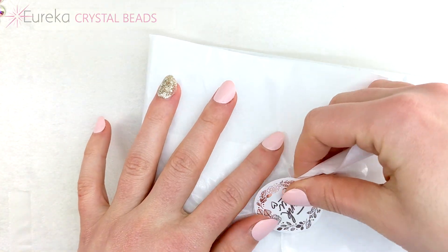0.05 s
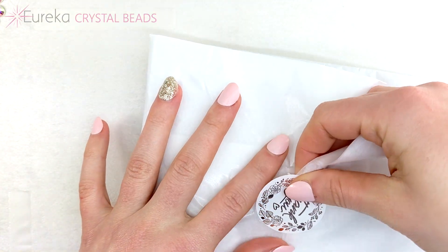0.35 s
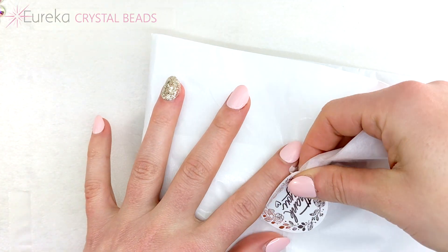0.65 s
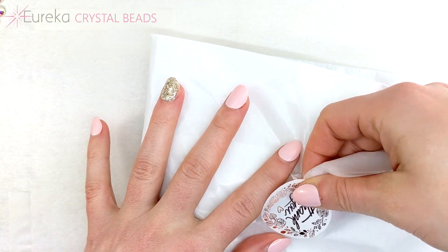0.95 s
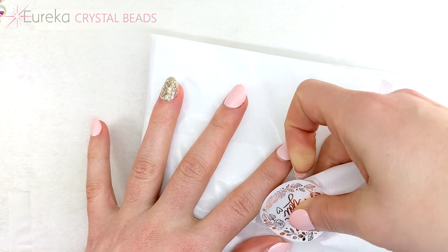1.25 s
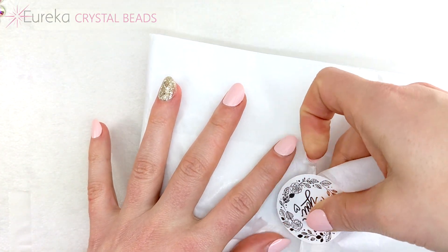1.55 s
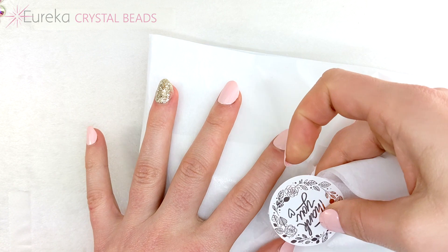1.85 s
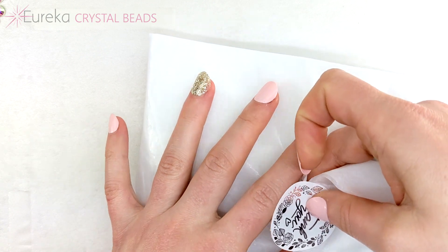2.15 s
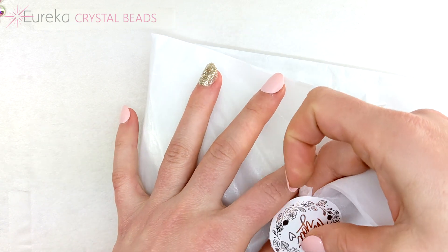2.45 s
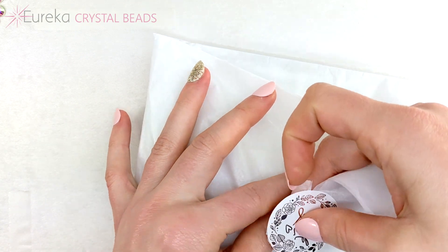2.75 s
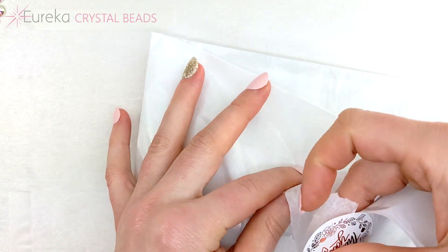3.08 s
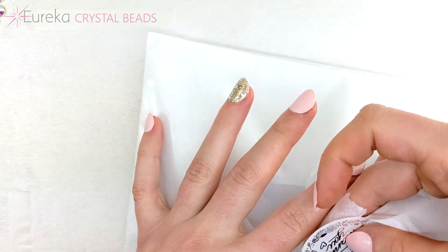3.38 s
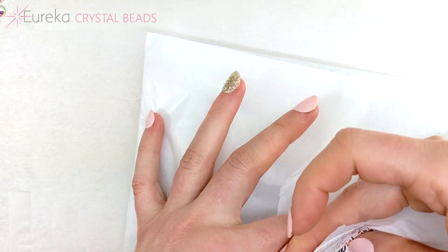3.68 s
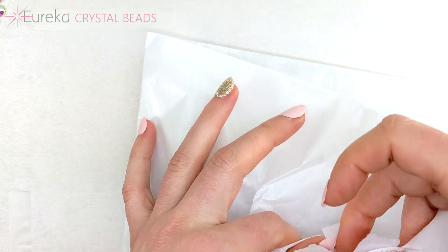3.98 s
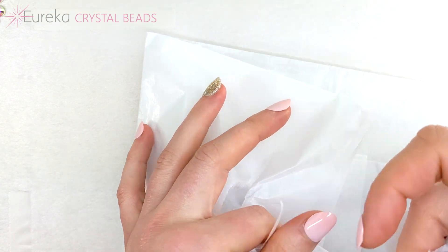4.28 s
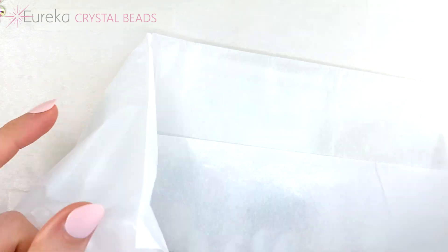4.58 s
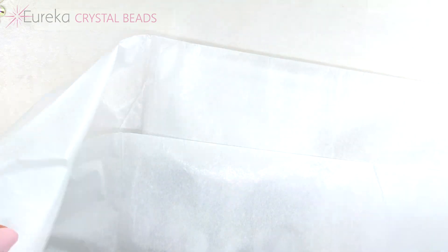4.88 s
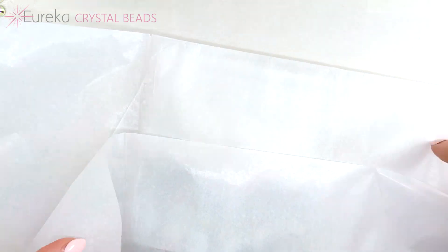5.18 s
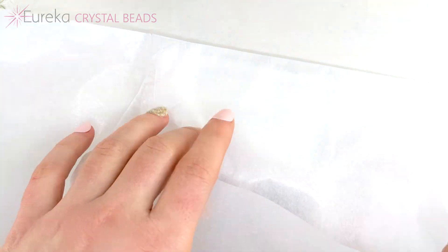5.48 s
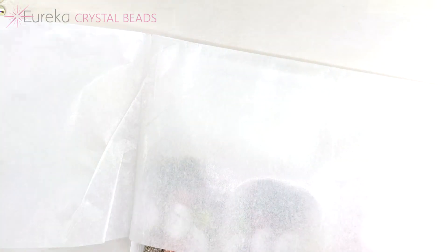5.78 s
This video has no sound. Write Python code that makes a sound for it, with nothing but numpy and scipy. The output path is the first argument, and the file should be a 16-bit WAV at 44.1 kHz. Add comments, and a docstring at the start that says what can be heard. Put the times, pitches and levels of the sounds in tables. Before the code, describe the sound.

A sharp, close crackle comes right at the start as hands begin peeling a sticker off a tissue paper parcel. Until about 3 seconds, short, uneven pulls tear the paper with dry crinkles and ticks. Single creases snap out, sharpest around 1.4, 2.3 and 2.9 seconds. From about 3.1 seconds the flap is crumpled aside, softer at first, with a fuller crunch near 4 seconds. From 4.4 seconds the sheet is swept open in longer, swishing rustles with a few more snaps. It eases briefly after 5 seconds, then the strongest swish comes around 5.7 to 5.9 seconds as the paper is flattened. Throughout, the parcel rubs faintly and dully on the table, and a faint low hum swells as the hands press. The paper sits slightly to the right, close to a stereo microphone in a small, quiet room.

```python
"""First comes a sharp crackle, close up: hands peel a sticker off a tissue paper parcel, tearing the paper.
Then they fold the sheet open on the table. Each stroke sets off a swarm of tiny buckles, single creases
snap out of the rustle, and the parcel rubs dully on the table. The stereo microphone is close by, in a
small, quiet room with a faint low hum that swells as the hands press."""
import sys
import numpy as np
from scipy import signal
from scipy.fft import rfft, irfft, next_fast_len
from scipy.io import wavfile
from scipy.ndimage import uniform_filter1d, map_coordinates

SR = 44100
rng = np.random.default_rng(int(sys.argv[2]) if len(sys.argv) > 2 else 0)


def int16_out(signal):
    """Quantize to a 16-bit WAV file."""
    q = np.round(np.clip(np.atleast_2d(signal).T, -1, 1) * 32767)
    wavfile.write(sys.argv[1], SR, q.astype(np.int16))


N = 261513

# Still air of the room. Each row: frequency in Hz, relative level in dB.
AIR_SPECTRUM = [(25, -12), (70, -5), (130, 10), (250, -4), (600, -4), (1200, -4), (4000, 1), (16000, -36)]
# Dull rub on the table. Each row: frequency in Hz, relative level in dB.
RUB_SPECTRUM = [(25, -39), (50, -21), (80, -12.5), (120, -2), (160, -4.5), (190, 4), (230, -1.5), (300, 2),
                (420, -21.5)]
# Hands press the parcel down. Each row: start, attack and hold in seconds, rub in dB, hum swell in dB
# against the rub. table_rub() and hum() add their own trims.
HAND_PRESSES = [(-0.016, 0.045, 0.018, -66, -9.5), (0.08, 0.2, 0.089, -71.5, 0),
                (0.469, 0.071, 0.18, -81.5, 2.5), (0.756, 0.054, 0.034, -69.5, -9),
                (1.009, 0.094, 0.22, -77, -1), (1.426, 0.036, 0.044, -73.5, -6),
                (1.764, 0.066, 0.066, -67.5, -7), (2.609, 0.233, 0.115, -73.5, 0.5),
                (2.946, 0.07, 0.013, -62.5, 1), (3.387, 0.25, 0.059, -74, -4.5),
                (3.746, 0.28, 0.049, -66, -2), (4.45, 0.066, 0.43, -63.5, -5.5),
                (4.923, 0.033, 0.015, -67.5, -15.0), (5.123, 0.049, 0.02, -71, -13.5),
                (5.359, 0.16, 0.095, -65.5, -3.5), (5.671, 0.08, 0.091, -53.5, -14)]
# Colour of the paper. Each row: frequency in Hz, gain in dB.
PAPER_COLOUR = [(200, -14), (300, -17.5), (450, -10.5), (750, -8.5), (1000, -19), (1300, -10.5), (1800, -2),
                (2900, -5), (4000, 0.5), (7500, 2), (9300, 0), (10500, 1), (13500, 12), (16000, -1.5)]
# Resonances of the sheet over the table. Each row: frequency in Hz, width in Hz, lift in dB.
SHEET_RESONANCES = [(559, 93, 4.5), (1396, 133, 6), (2286, 66, 6.5), (3160, 350, 3), (4360, 37, 5.5),
                    (4920, 84, -1.5), (7170, 55, 3.5), (11600, 420, -18)]
# Hollow note of the taut wrapping. Each row: time in seconds, lift in dB.
HOLLOW_LIFT = [(0, 1.5), (2.2, 0), (4.1, 0), (5.2, -2.5)]
# The paper as the microphone hears it, swinging right as it opens.
# Each row: time in seconds, delay of the left channel in seconds.
PAPER_BEARING = [(0, .00008), (4.4, .00008), (4.7, .00018), (5.05, .00028), (5.2, 0), (5.4, 0),
                 (5.55, .00012), (5.93, .0001)]
# Short pulls at the sticker; from 3.1 s the flap is crumpled aside; from 4.4 s the sheet is swept flat.
# Each row: start, attack and hold in seconds, crackle in dB, then folds and flap in dB against the
# crackle. rustle() trims the flap.
HAND_STROKES = [ (-0.016, 0.016, 0.034, -35.5, -6, -13.5), (0.07, 0.072, 0.055, -44.5, -5, -13.5),
                (0.204, 0.04, 0.12, -51, -4.5, -9.5), (0.366, 0.067, 0.03, -54.5, -8, -11.5),
                (0.45, 0.049, 0.033, -43.5, -1.5, -7.5), (0.54, 0.046, 0.11, -47.5, -3.5, -11.5),
                (0.764, 0.016, 0.013, -44, 1, -6.5), (0.801, 0.004, 0.033, -40.5, -4, -10.5),
                (0.975, 0.11, 0.098, -42.5, -8, -18), (1.197, 0.01, 0.051, -48, -9, -20),
                (1.32, 0.014, 0.045, -58.5, 0, -21), (1.417, 0.004, 0.022, -46.5, -6, -25),
                (1.437, 0.031, 0.024, -36.5, -5, -12.5), (1.485, 0.036, 0.026, -41.5, -4.5, -10),
                (1.574, 0.023, 0.11, -58.5, -8.5, -11.5), (1.765, 0.079, 0.027, -32.5, -6, -13.5),
                (1.95, 0.0059, 0.058, -48, -12.5, -15.5), (2.09, 0.051, 0.13, -54, -10.5, -22),
                (2.295, 0.014, 0.029, -39, -11.5, -15.5), (2.392, 0.034, 0.076, -43, -7.5, -22),
                (2.56, 0.059, 0.14, -50.5, -2.5, -13), (2.765, 0.019, 0.12, -44.5, -6, -17.5),
                (2.94, 0.0087, 0.077, -35.5, -2.5, -11), (3.11, 0.054, 0.046, -50, -8, -15.5),
                (3.39, 0.061, 0.037, -48, -3, -13), (3.478, 0.076, 0.042, -42, -1.5, -12.5),
                (3.604, 0.023, 0.042, -51.5, -1, -7), (3.7, 0.055, 0.24, -50.5, -7, -18.5),
                (3.935, 0.046, 0.048, -38, 3, -16), (4.152, 0.013, 0.024, -47.5, 0.5, -31.5),
                (4.225, 0.089, 0.024, -49, -7, -33), (4.39, 0.21, 0.057, -40, -10, -18),
                (4.56, 0.12, 0.15, -38, -8.5, -17), (4.86, 0.061, 0.04, -35.5, -7.5, -19.5),
                (4.969, 0.012, 0.057, -45.5, -12.5, -23), (5.11, 0.014, 0.028, -55.5, -13, -25),
                (5.2, 0.034, 0.05, -40, -7, -20.5), (5.28, 0.083, 0.0073, -39, -8, -21),
                (5.474, 0.07, 0.043, -37.5, -8, -21.5), (5.66, 0.053, 0.083, -34, -6, -15.5),
                (5.735, 0.082, 0.067, -30.5, -9.5, -12)]
# Creases that snap. Each row: time in seconds, level in dB, folds and sizzle in dB against that level,
# ring pitch in Hz, left minus right in dB. snaps() adds its own trims to the levels.
CREASE_SNAPS = [(0.0163, -18.5, -7, -17, 5170, -6), (0.187, -24, -20, -16, 5530, -2),
                (0.3178, -29.5, -24, -11, 9080, -10.5), (0.381, -34, -24, -0.5, 7000, -6),
                (0.473, -33, -3.5, -15, 2380, -5), (0.5109, -30, 1, -12, 2950, -8),
                (0.675, -36, -25, -7, 4170, -10), (0.7362, -28, -8, -12, 4330, -5),
                (0.7654, -37, 6, -12, 2410, -6), (0.7775, -30.5, 7, -11, 2340, -5),
                (0.7998, -20.5, -12, -11, 2340, 0), (0.949, -39.5, -12, -23, 9100, 0),
                (0.9991, -34.5, -16, -23, 6240, -13), (1.0743, -24, -15, -10, 3000, -7),
                (1.228, -26, -23, -9.5, 7120, -2), (1.4163, -28.5, -7, -29, 5050, -13),
                (1.4366, -14, -28, -22, 2320, -2), (1.475, -17.5, -4.5, -19, 4920, -5),
                (1.8038, -23.5, -6, -27, 7230, -12), (1.9533, -28, -7, -15, 5000, 0),
                (1.9766, -32, -18, -3.5, 8140, -8), (2.112, -29, -22, -17, 3380, 7.5),
                (2.159, -42, -24, -5, 9000, 12), (2.2145, -26.5, -6, -12, 8840, -1),
                (2.3135, -23.5, -18, -24, 7500, -7), (2.3207, -14, -11.5, -35, 3640, 0.5),
                (2.3552, -18, -21, -23, 6640, -7.0), (2.4219, -23.5, -28, -5.5, 7030, -10),
                (2.4723, -19.5, -6.5, -14, 6270, -5), (2.5735, -38, -33, 5.5, 9000, -12),
                (2.6342, -21.5, -15, -17, 8970, -5), (2.7119, -29.5, -0.5, -16, 2720, 0),
                (2.7206, -22, -4, -17, 7000, -5), (2.7764, -34, -8, -8, 9150, -12),
                (2.8753, -13, -20, -18, 2330, -4), (2.9447, -17, -22, -15, 9350, 2),
                (2.9672, -20, -8, -9, 2900, -4), (3.1256, -37.5, -10, -1.5, 9500, -5),
                (3.1624, -33.5, -15, -12, 4480, -19.5), (3.232, -44, -21, -1.5, 9200, -19),
                (3.3064, -49, -38, -4, 8850, -8), (3.3328, -49, -17, -14, 7200, -20),
                (3.419, -32, -23, -7, 9400, -3.0), (3.954, -28.5, -13, -3, 2430, -7),
                (4.1564, -42, -1, -27, 2040, 5), (4.17, -23, -7, -34, 2100, 5),
                (4.3046, -24.5, -17, -33, 2860, 4), (4.4433, -23, -23, -25, 4660, 0),
                (4.4857, -19, -13, -21, 4940, -6.5), (4.5407, -25, -9, -18, 8050, -15),
                (4.577, -21.5, -3, -28, 4470, -1), (5.1986, -36.5, -10, -8, 7550, 3),
                (5.227, -22, -25, -9, 7140, -6), (5.3617, -25, -17, -16, 4420, -2.0),
                (5.4748, -41, -1, -18, 2340, 10), (5.5024, -19, -17, -12, 5080, 0),
                (5.678, -30, -15, -11, 7170, -11)]

# The whole sheet sounds low, folds in the middle, fine fibres high. Each pair: band edges in Hz.
FLAP_BAND, FOLDS_BAND = (250, 1150), (980, 2900)
CRACKLE_BAND, SIZZLE_BAND = (2900, 9800), (10400, 20500)


def from_db(db):
    """Decibels to gain."""
    return 10 ** (np.asarray(db) / 20)


def rms_one(x):
    """Scale to unit rms."""
    return x / np.sqrt(np.mean(x ** 2) + 1e-20)


def band(x, low_hz, high_hz, order=4):
    """Causal band-pass."""
    sos = signal.butter(order, [low_hz, min(high_hz, .48 * SR)], "band", fs=SR, output="sos")
    return signal.sosfilt(sos, x + 1e-18)


def resonate(x, hz, width_hz):
    """The part of x that one resonance passes."""
    return signal.lfilter(*signal.iirpeak(hz, hz / width_hz, fs=SR), x)


def coloured(x, spectrum):
    """Give x a smooth spectrum."""
    hz, db = np.transpose(spectrum)
    size = next_fast_len(N + SR // 10)
    bins_hz = np.maximum(np.arange(size // 2 + 1) * SR / size, 1)
    gain = from_db(np.interp(np.log(bins_hz), np.log(hz), db))
    return irfft(rfft(x, size) * gain, size)[..., :N]


def stereo_noise(side_db):
    """White noise whose stereo width is set by side_db."""
    mid, side = rng.standard_normal((2, N))
    return mid + from_db(side_db) * side * [[1], [-1]]


def waver(per_s, depth_db):
    """A gain that wanders at random."""
    knots = rng.standard_normal(4096)
    return from_db(depth_db * np.interp(np.arange(N) / SR * per_s, np.arange(len(knots)), knots))


def gesture(start_s, attack_s, hold_s, release_db_per_s, sag_db_per_s=31.5, creep_share=.12, creep_s=.009):
    """A hand creeps in, takes up the strain, sags as the paper yields and lets go; gain 0-1."""
    age = np.arange(N) / SR - start_s
    creep = creep_share * np.exp(np.clip(age / creep_s, -20, 0))
    rise = np.maximum(np.clip(age / max(attack_s, 1 / SR), 0, 1), creep)
    sag_db = sag_db_per_s * np.clip(age - attack_s, 0, hold_s)
    release_db = release_db_per_s * np.maximum(age - attack_s - hold_s, 0)
    return rise * from_db(-np.minimum(sag_db + release_db, 200))


def hand_gains(rows, release_db_per_s):
    """One gain curve for each level column of a table of gestures; overlaps add in power."""
    power = 0
    for start_s, attack_s, hold_s, level_db, *relative_db in rows:
        gains = from_db(level_db + np.array([0, *relative_db]))
        power = power + np.outer(gains, gesture(start_s, attack_s, hold_s, release_db_per_s)) ** 2
    return np.sqrt(power)


def room_air(level_db=-83.5):
    """Room tone: still air, wide and very faint."""
    return from_db(level_db) * rms_one(coloured(stereo_noise(side_db=-1.0), AIR_SPECTRUM))


def hum(swell, hz=137.4, swell_db=-1.5, rest_db=-89.5):
    """One faint low tone that wavers, and swells while the hands press."""
    strength = np.hypot(from_db(swell_db) * swell, from_db(rest_db)) * waver(per_s=14, depth_db=2.0)
    return np.sqrt(2) * strength * np.sin(2 * np.pi * hz * np.arange(N) / SR)


def room_tail(x, t60=0.1, gap_s=0.0036, low_hz=700, high_hz=6000):
    """The small room returns a short diffuse tail, unrelated in the two channels."""
    age = np.arange(SR // 2) / SR
    diffuse = band(rng.standard_normal((2, len(age))), low_hz, high_hz, order=1)
    tail = diffuse * from_db(-60 * age / t60) * (age > gap_s)
    return signal.oaconvolve(x, tail / np.sqrt(np.sum(tail ** 2) / 2), axes=1)[:, :N]


def table_rub(press, trim_db=3.0, rest_db=-89.0):
    """The parcel shifts under the hands with a dull, low rub."""
    rub = rms_one(coloured(stereo_noise(side_db=-10.0), RUB_SPECTRUM))
    return from_db(trim_db) * np.hypot(press, from_db(rest_db)) * rub


def place(x, narrow_below_hz=1100, low_side_db=-9.0):
    """Low notes reach both channels nearly alike; the left lags as the paper moves right."""
    mid, side = x.mean(0), (x[0] - x[1]) / 2
    low_side = signal.sosfilt(signal.butter(1, narrow_below_hz, fs=SR, output="sos"), side)
    side = side + (from_db(low_side_db) - 1) * low_side
    n = np.arange(N)
    delay = np.interp(n / SR, *np.transpose(PAPER_BEARING)) * SR
    return np.array([map_coordinates(mid + side, [n - delay], order=5), mid - side])


def hollow(x, hz=1490, width_hz=350):
    """The hollow note of the taut wrapping fades as the parcel comes open."""
    lift = from_db(np.interp(np.arange(N) / SR, *np.transpose(HOLLOW_LIFT)))
    return x + (lift - 1) * resonate(x, hz, width_hz)


def sheet(x):
    """Everything the paper radiates carries its colour and resonances."""
    for hz, width_hz, lift_db in SHEET_RESONANCES:
        x = x + (from_db(lift_db) - 1) * resonate(x, hz, width_hz)
    return coloured(x, PAPER_COLOUR)


def facet(ring_db=5.0, ring_s=0.0029, lag_spread_s=.00009, pan_spread_db=3.5, ring_low_hz=1500, size=256):
    """A patch of paper flips: a crack, lagging in one channel, and a ring that differs by direction."""
    age = np.arange(size) / SR
    ring = band(rng.standard_normal((2, size)) * np.exp(-age / ring_s), ring_low_hz, SR / 2, order=2)
    flip = from_db(ring_db) * rms_one(ring) / np.sqrt(size)
    flip[:, 0] += 1  # the crack
    lag = round(lag_spread_s * rng.standard_normal() * SR)
    flip = np.array([np.pad(channel, (max(d, 0), size))[:size] for channel, d in zip(flip, (lag, -lag))])
    pan = from_db(pan_spread_db * rng.standard_normal() * np.array([[.5], [-.5]]))
    return flip / np.sqrt(np.sum(flip ** 2) / 2) * pan


def ticks(low_hz=2200, high_hz=15000, width_hz=1700, size_db=5.5, run_s=0.0042, count=520, size=512):
    """Lone fibres break with dry ticks, each with a broad colour of its own."""
    out = np.zeros((2, N + size))
    age = np.arange(size) / SR
    for when, colour, strength in rng.random((count, 3)):
        at, hz = int(when * N), low_hz + (high_hz - low_hz) * colour
        run = rng.standard_normal((2, size)) * np.exp(-age / run_s)
        tick = rms_one(resonate(run, hz, width_hz))
        out[:, at:at + size] += from_db(-size_db * np.log(strength + 0.049)) * tick
    return rms_one(out[:, :N])


def pop(hz, t60, size=2048):
    """A taut panel rings briefly at its own pitch, out of step in the two channels; unit energy."""
    age = np.arange(size) / SR
    tone = np.sin(2 * np.pi * hz * age + rng.standard_normal((2, 1))) * from_db(-60 * age / t60)
    return rms_one(tone) / np.sqrt(size)


def pops(low_hz=1700, high_hz=15000, cycles=75, size_db=2.5, count=1100, size=2048):
    """Panels of all sizes pop through at random moments; small ones ring higher and shorter."""
    out = np.zeros((2, N + size))
    for when, pitch, strength in rng.random((count, 3)):
        at, hz = int(when * N), low_hz * (high_hz / low_hz) ** pitch
        out[:, at:at + size] += from_db(-size_db * np.log(strength + 0.011)) * pop(hz, cycles / hz)
    return rms_one(out[:, :N])


def buckles(per_s=3000, size_db=-0.5, clump_db=5.0, clump_s=0.0046, even_s=0.031,
            facets_per_s=24, facet_spread=.9, facets=28):
    """Tiny buckles come in avalanches on the few facets being bent just then."""
    avalanche = rms_one(uniform_filter1d(rng.standard_normal(N), int(clump_s * SR)))
    sizes = from_db(size_db * np.minimum(rng.exponential(1, N), 5) + clump_db * avalanche)
    clicks = sizes * rng.choice([-1, 1], N) * (rng.random(N) < per_s / SR)
    # the hand feeds in energy steadily, so a big avalanche leaves less for its neighbours
    local_power = np.abs(uniform_filter1d(clicks ** 2, int(even_s * SR)))
    clicks = clicks / np.sqrt(local_power + 1e-6)
    # the bend travels across the sheet, so the colour keeps shifting
    bent = np.floor(facets_per_s * np.arange(N) / SR + facet_spread * rng.standard_normal(N)) % facets
    flips = (signal.oaconvolve([clicks * (bent == k)], facet(), axes=1)[:, :N] for k in range(facets))
    return rms_one(sum(flips))


def rustle(flap_db=1.5, sizzle_db=-4.5, sizzle_follows_folds=0.17, pops_db=-7.5, ticks_db=-0.5,
           slide_from_db=-49.5, slide_per_db=0.06, treble_pan_db=3.5, flap_pan_db=2.7):
    """Buckles, pops, ticks and friction follow the strokes; the paper catches and gives unevenly."""
    rest = from_db([[-96], [-82.5], [-94.5]])  # held paper never lies quite still
    crackle, folds, flap = np.hypot(hand_gains(HAND_STROKES, release_db_per_s=423), rest)
    sizzle = crackle * (folds / crackle) ** sizzle_follows_folds
    crinkle = rms_one(buckles() + from_db(pops_db) * pops() + from_db(ticks_db) * ticks())
    crinkle *= waver(per_s=54, depth_db=1.06)
    # harder strokes slide paper over paper and blur into a swish
    slide = np.clip(slide_per_db * (20 * np.log10(crackle) - slide_from_db), 0, 1)
    friction = band(rms_one(stereo_noise(side_db=-1.5)), 1770, SR / 2, order=1)
    paper = sheet(np.sqrt(1 - slide) * crinkle + np.sqrt(slide) * friction)
    out = np.zeros((2, N))
    for edges, gain, pan_db in ((CRACKLE_BAND, crackle, treble_pan_db),
                                (FOLDS_BAND, folds, 0),
                                (FLAP_BAND, flap * from_db(flap_db), flap_pan_db),
                                (SIZZLE_BAND, sizzle * from_db(sizzle_db), treble_pan_db)):
        part = band(paper, *edges)
        out += part / np.std(part.mean(0)) * gain * from_db([[-pan_db / 2], [pan_db / 2]])
    return out


def snaps(trim_db=12.5, folds_db=8.5, flap_db=0.5, sizzle_db=8.5, per_s=4500, run_s=.004, lead_db=2.0,
          strain_db=-22.5, strain_s=0.012, ring_db=-6.5, ring_t60=0.035, size=2048):
    """A crease strains, gives way with one crack and rings; smaller buckles run briefly along it."""
    before = size // 4  # samples of strain ahead of the crack
    tracks = np.zeros((3, 2, N + 2 * size))
    age = (np.arange(size) - before) / SR
    strain = from_db(strain_db) * np.exp(-np.abs(age) / strain_s)
    shape = np.where(age < 0, strain, np.exp(-np.abs(age) / run_s))
    for time_s, level_db, folds_rel_db, sizzle_rel_db, ring_hz, pan_db in CREASE_SNAPS:
        run = rng.standard_normal(size) * (rng.random(size) < per_s / SR) * shape
        run[before] = from_db(lead_db)  # the first crack
        crack = signal.fftconvolve([run], facet(), axes=1)[:, :size]
        crack = crack / np.sqrt(np.sum(crack ** 2, axis=1, keepdims=True))
        ring = np.pad(pop(ring_hz, ring_t60), ((0, 0), (before, 0)))[:, :size]
        gain = from_db([[level_db + pan_db / 2], [level_db - pan_db / 2]])
        snap = (crack + from_db(ring_db) * ring) * gain
        at = round(time_s * SR)
        # each crease has its own share of crackle, folds and sizzle
        for track, db in zip(tracks, (0, folds_rel_db + folds_db, sizzle_rel_db + sizzle_db)):
            track[:, at:at + size] += from_db(db) * snap
    crackle, folds, sizzle = sheet(tracks[..., before:before + N])
    body = band(folds, *FOLDS_BAND) + from_db(flap_db) * band(folds, *FLAP_BAND)
    return from_db(trim_db) * (band(crackle, *CRACKLE_BAND) + body + band(sizzle, *SIZZLE_BAND))


def scene(room_db=-11.5):
    """Paper and table close to the microphone, the room and its hum behind them."""
    paper = place(hollow(rustle() + snaps()))
    press, swell = hand_gains(HAND_PRESSES, release_db_per_s=350)
    return room_air() + from_db(room_db) * room_tail(paper) + table_rub(press) + hum(swell) + paper


def record(dry):
    """The top is cut steeply above 16 kHz."""
    return signal.sosfilt(signal.ellip(10, .2, 80, 16080, fs=SR, output="sos"), dry)


dry = scene()
out = record(dry)
int16_out(out)
```